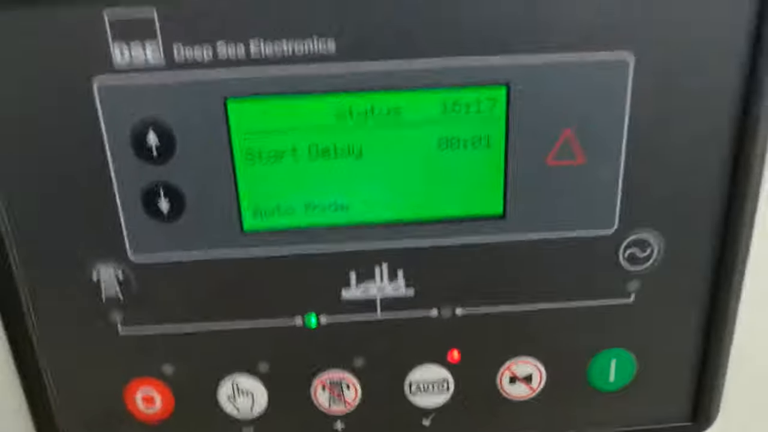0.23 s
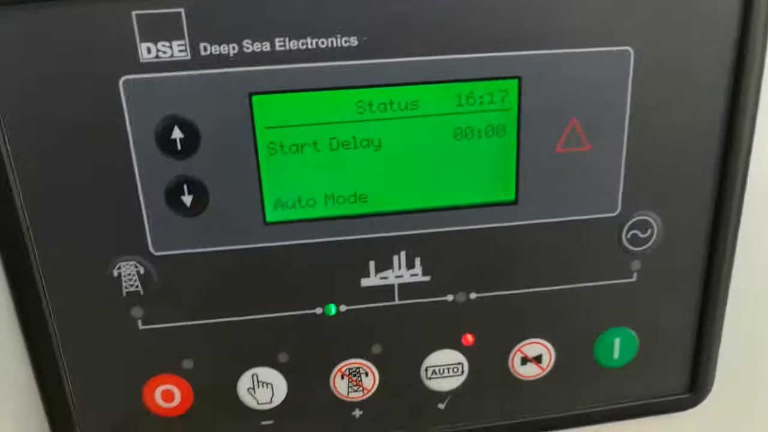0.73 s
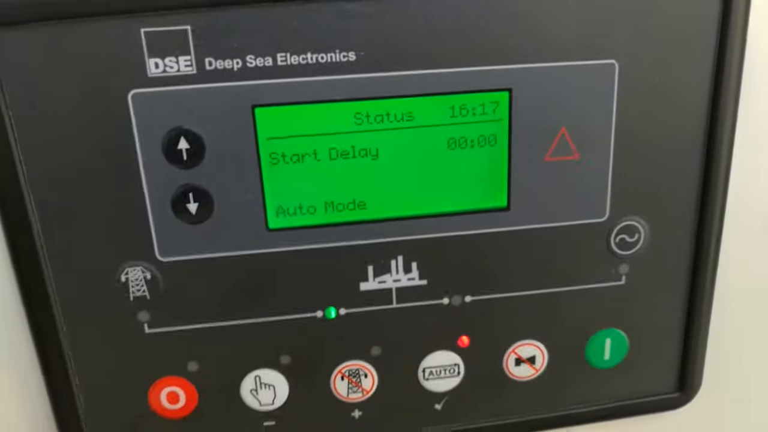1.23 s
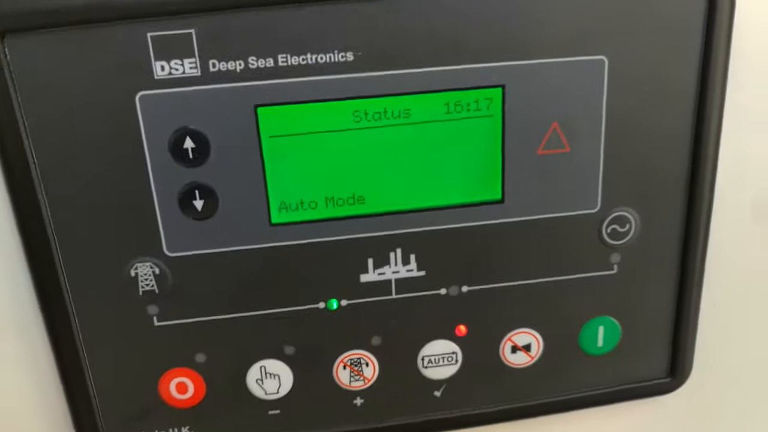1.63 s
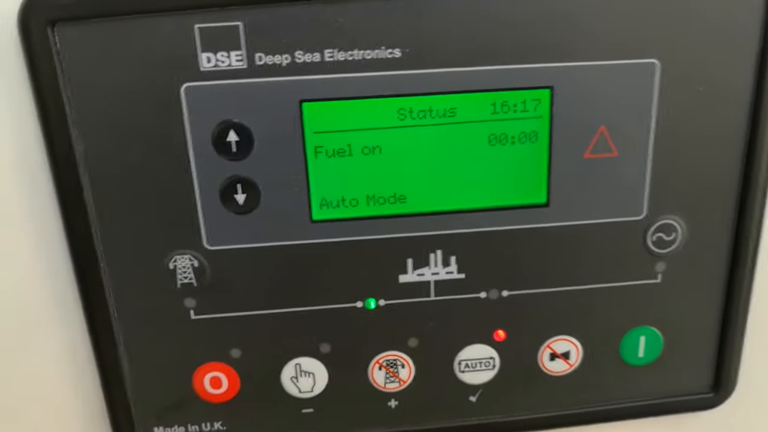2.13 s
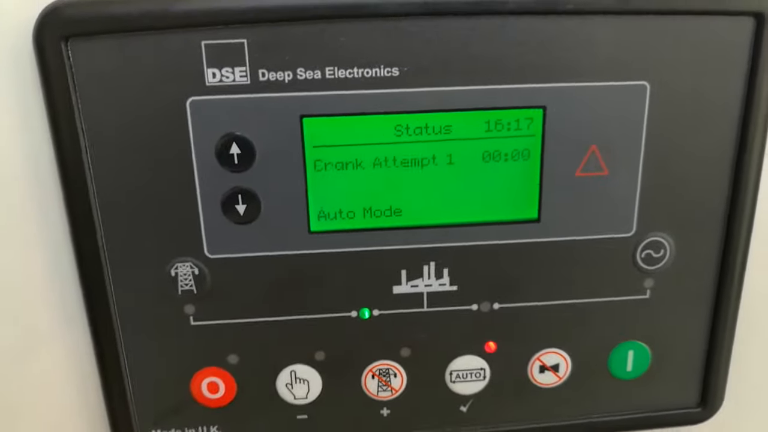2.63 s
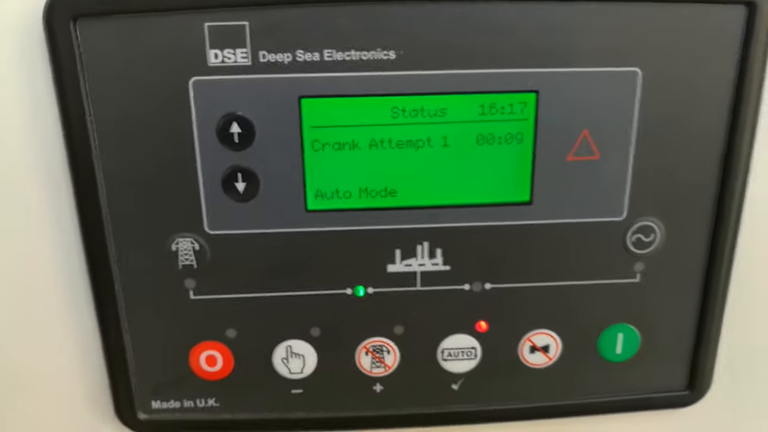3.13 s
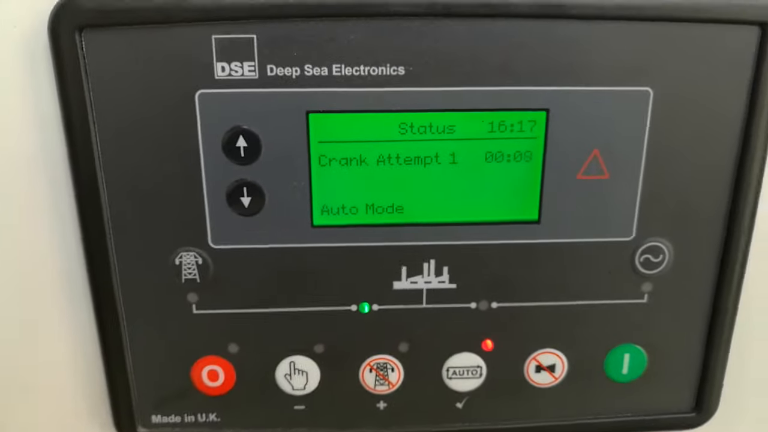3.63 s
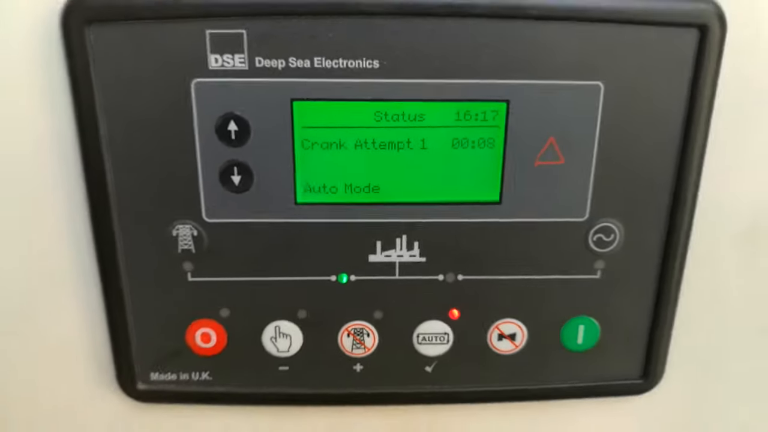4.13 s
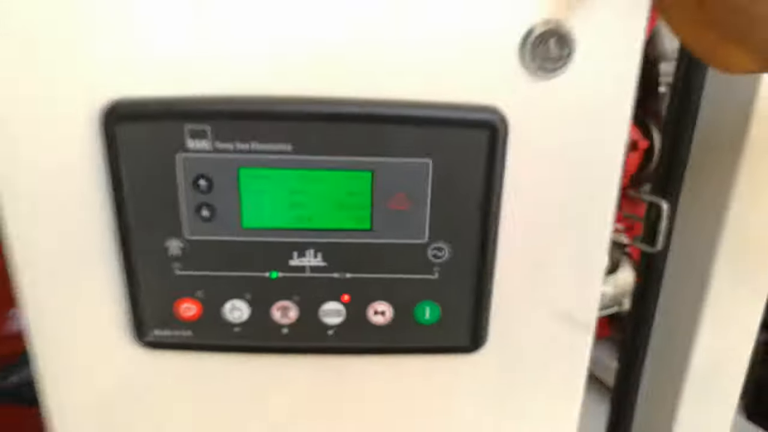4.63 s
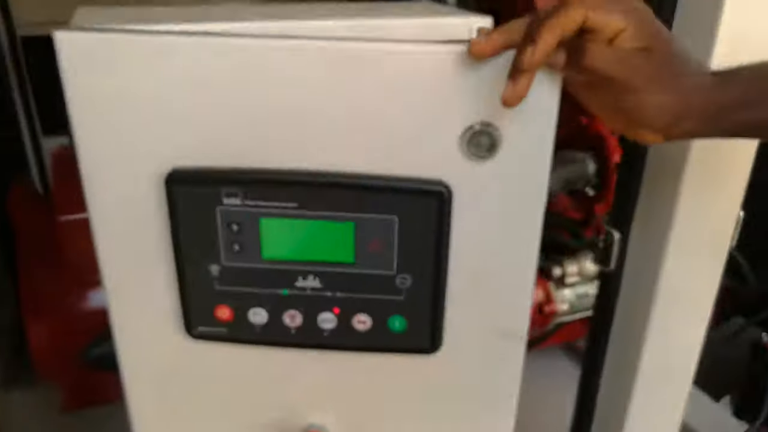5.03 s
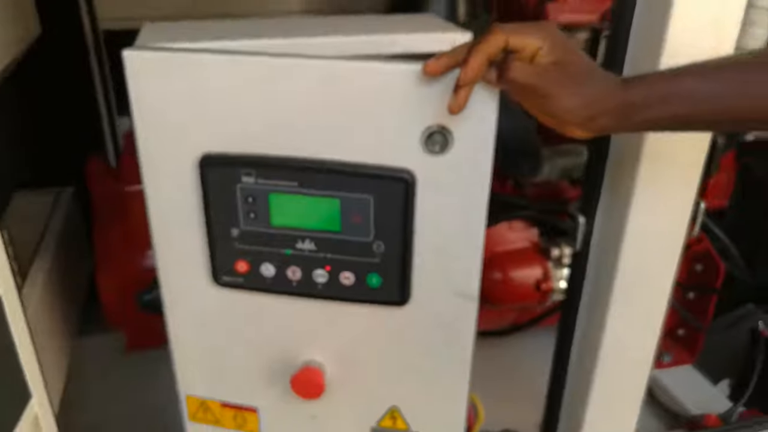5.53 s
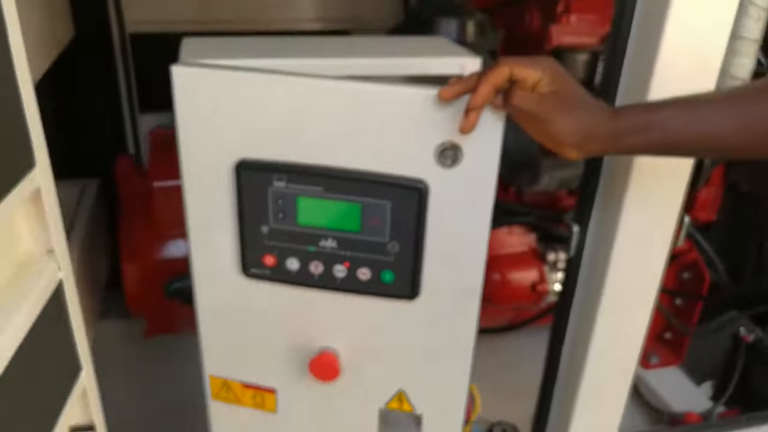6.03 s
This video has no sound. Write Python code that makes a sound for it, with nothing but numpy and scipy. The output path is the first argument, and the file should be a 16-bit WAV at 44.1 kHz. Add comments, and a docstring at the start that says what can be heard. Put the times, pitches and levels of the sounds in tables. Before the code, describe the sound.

Very quiet air with a faint distant hum and soft broom-like strokes. A small relay click, then a sudden heavy clank as the starter engages, whining and groaning through compressions. The diesel catches, knocks hard, growls upward with rattling metal, overshoots slightly, sags and settles into a steady drone. Handheld stereo microphone close to the steel enclosure, stepping back as the engine reaches speed.

```python
"""A three-cylinder diesel generator in a steel enclosure starts, races past its final speed and settles.
Crank angle times its exhaust pulses, metal knocks and gear tones; speed and fuel curves set their levels.
Before that a relay clicks and the starter slams in: a whine glides with its speed and dips at compressions.
Decaying coloured noise with damped sines makes the separate blows, clicks and panel rattles.
Behind them lie yard noise, the hum of a distant machine, broom-like strokes and faint far tones."""
import sys
import numpy as np
from scipy import signal
from scipy.fft import rfft, irfft, next_fast_len
from scipy.io import wavfile
from scipy.ndimage import uniform_filter1d

SR = 44100
rng = np.random.default_rng(int(sys.argv[2]) if len(sys.argv) > 2 else 0)


def int16_out(signal):
    """Quantize to a 16-bit WAV file."""
    q = np.round(np.clip(np.atleast_2d(signal).T, -1, 1) * 32767)
    wavfile.write(sys.argv[1], SR, q.astype(np.int16))


N = 277080
TIME = np.arange(N) / SR  # s

# Crankshaft speed. Each row: time in seconds, speed in rpm; the first firing falls on the first row.
RPM = [(3.049, 381), (3.25, 553), (4.0, 1415), (4.17, 1679), (4.32, 1698), (4.92, 1517), (5.1, 1560),
       (6.28, 1557)]
# Fuel: full up to speed, cut back on the overshoot, one surge to catch the sag.
# Each row: time in seconds, fuel from 0 to 1.
FUEL = [(4.2, 0.88), (4.35, .28), (4.87, 0.19), (4.9, 0.58), (4.985, 0.94), (5.03, 0.81), (5.13, 0.61),
        (5.22, 0.39), (5.35, 0.48), (5.8, 0.48), (6.28, 0.45)]
# How each engine sound follows the controls; it swells at a critical speed that shakes the enclosure.
# Each law: level in dB at full fuel and rated speed before that swell, dB per doubling of speed,
# dB lost with the fuel shut, critical speed in rpm, swell there in dB, dB lost on stepping back.
THUD_LAW = (-29, -3, 1, 1110, 6.5, 3)
BOOM_LAW = (-23.5, 3, 7, 1180, 0, 0)
KNOCK_LAW = (-21.5, 4.5, 14, 1298, 1.15, 0)
VALVE_LAW = (-30, 3.5, 3, 950, 5.5, 5.5)
AIR_LAW = (-29, 3.5, 4.5, 918, 2, 4)
SHAKE_WIDTH_RPM = 267  # from the critical speed to 1/e of the swell
STEP_BACK_S = (4.3, 4.58)  # the listener steps away from the enclosure

# Exhaust spectrum. Each row: frequency in Hz, relative density in dB per Hz.
EXHAUST = [(13, -36), (22, -12), (65, -15.5), (102, -6), (183, 0), (258, -9), (318, -3.5), (413, -21),
           (494, -11), (522, -12.5), (600, -18), (780, -50), (1320, -120)]
# Air resonances of the enclosure. Each row: frequency in Hz, level in dB, t60 in seconds.
CABIN_MODES = [(65, -1, 0.32), (180, -8.5, 0.21)]
# Settled drone. Each row: multiple of the four-stroke cycle rate, relative level in dB.
DRONE = [(1, -41), (2, -32), (3, -14), (4, -27), (5, -15), (6, -14), (7, -26), (8, -20), (9, -22), (10, 0),
         (11, -21), (12, -22), (13, -5), (14, -21), (15, -17), (16, -12), (17, -22), (18, -20), (19, -27),
         (20, -22), (21, -26), (22, -24), (23, -22), (24, -14), (25, -26), (26, -17), (27, -18), (28, -25)]
DRONE_DB = -23.5  # before the drone's share of the power is taken
# The bass merges into the drone between these times, up to the drone's final share of the power.
SETTLE_S, DRONE_SHARE = (4.87, 5.2), .9
# Growl of the exhaust as the engine races up. Each row: time in seconds, level in dB.
GROWL = [(3.06, -45), (3.2, -25), (3.35, -22.5), (3.5, -28), (3.63, -22), (3.74, -23.5), (4.02, -19),
         (4.07, -38), (4.18, -23.5), (4.55, -26), (4.85, -36), (5.3, -58)]
# Enclosure resonances that the growl's orders climb through. Each row: frequency in Hz, relative level in dB.
GROWL_COLOUR = [(30, -15), (66, -6), (90, -8), (110, -6.5), (135, 0), (155, 2), (180, 4.5), (215, -3.5),
                (245, -7.5), (270, -16), (315, -6.5), (350, -18), (400, -36)]
# Struck block, heard near. Each row: frequency in Hz, relative density in dB per Hz.
BLOCK = [(210, -49), (350, 18.5), (412, -9), (680, -0.5), (831, -5), (954, 4.5), (1290, -1.5), (1580, -2.5),
         (1900, -3.5), (2200, -5), (2950, -5), (3470, -3.5), (4080, -6.5), (7000, -16), (9100, -48),
         (15400, -120)]
# Clear rings of the block and its covers. Each row: mean frequency in Hz, mean level in dB, t60 in seconds.
BLOCK_MODES = [(540, -21, 0.28), (701, -21.5, 0.46), (945, -11.5, 0.21), (1045.5, -15.5, 0.23),
               (1262, -17, 0.24), (1402, -12.5, 0.11), (1554, -7.5, 0.13), (1917, -10.5, 0.1),
               (3450, -19, 0.089), (3820, -12, 0.074), (5510, -11, 0.076)]
# Knock heard from a step away, where no single ring stands out.
# Each row: frequency in Hz, relative density in dB per Hz.
KNOCK_AFAR = [(350, 16), (430, -4), (530, -5), (580, -7.5), (690, -0.5), (860, -2.5), (970, 3), (1080, -2),
              (1230, 0.5), (1330, -1.5), (1520, -1), (1700, -0.5), (1900, -2.5), (2030, -5.5), (2700, -5.5),
              (5000, -7)]
# Timing gears. Each row: teeth meshing per cycle, median level in dB, time in seconds when the tone is half in.
GEAR_TONES = [(73, -41, 5.1), (76, -37.5, 5.4), (79, -43, 5.1), (87, -42.5, 5.1), (95, -41.5, 5.6),
              (126, -37.5, 5.1), (129, -42, 5.4), (132, -40, 5.1)]
# Rushing air. Each row: frequency in Hz, relative density in dB per Hz.
AIR = [(240, -42), (400, -10), (562, -8), (687, -5), (826, -8), (949, 0), (1290, -5), (1580, -2),
       (2050, 25), (3470, 0), (6240, -16.5), (11200, -19.5), (16000, -31)]

# The unloaded starter spins up towards a top pitch, with this time constant.
SPIN_FROM_S, SPIN_UP_S, WHINE_TOP_HZ = 2.4, .5, 8540
# Compressions drag the starter down. Each row: slowest moment in seconds, time to 1/e in seconds,
# share of speed lost, rise of the gear noise in dB.
COMPRESSIONS = [(2.696, 0.061, 0.35, 5.5), (2.939, 0.057, .33, 11), (3.088, 0.081, .25, 0.5)]
LOAD_LEAD_S = 0.013  # the teeth bear hardest this long before the slowest moment
# Starter noises. Each law: level in dB at half the top speed, dB per doubling of speed.
RUMBLE_LAW = (-33, -4)
GEAR_LAW = (-33.5, -2.5)
BRUSH_LAW = (-33, 4.8)
# Starter spectrum. Each row: frequency in Hz, relative density in dB per Hz.
STARTER = [(15, -41), (25, -11), (59, -1.5), (185, -2.5), (363, -11.5), (575, -10.5), (936, 3), (1100, -11),
           (1260, -6.5), (1440, -8), (2280, -7), (3160, -4.5), (6210, -25), (10700, -25.5), (16000, -33.5)]
# Starter housing and ring gear. Each row: frequency in Hz, width in Hz, lift in dB.
GEAR_MODES = [(440, 17, 21), (855, 28, 3), (945, 20, 8.5), (1250, 28, 13), (2030, 61, 10), (3140, 200, 0)]
# Housing resonances that the whine glides through. Each row: frequency in Hz, level in dB.
WHINE_COLOUR = [(1500, -54), (1950, -35), (2450, -36), (2850, -28.5), (3450, -25.5), (4300, -33),
                (4900, -25.5), (5500, -42), (7200, -33), (8200, -43)]
# Main mesh and its sidebands. Each row: ratio to the main mesh, relative level in dB.
WHINE_PARTIALS = [(.8, -13), (.92, -11), (1, 0), (1.08, -12)]
# Higher meshes, heard while the starter spins up. Each row: ratio to the main mesh, relative level in dB.
HIGHER_MESHES = [(1.31, -12), (1.72, -10)]
# Shares of pitch: the whine's waver, and the extra while the pinion chatters just before the first firing.
WHINE_WAVER, CHATTER_WAVER = .012, .025
# The housing groans when the teeth bear hard. Each row: peak in seconds, level in dB, time to 1/e in seconds.
GROANS = [(2.535, -36, .025), (2.612, -32, .018), (2.655, -23, .014), (2.693, -28, .014),
          (2.825, -30, .022), (2.893, -23, .022)]
# Notes of the groan. Each row: frequency in Hz, relative level in dB, exponent applied to the groan's envelope.
GROAN_NOTES = [(1258, 0, 1), (945, -17, .5)]
# The ring gear squeals under load. Each row: time in seconds, frequency in Hz, level in dB.
SQUEAL = [(2.67, 3160, -70), (2.70, 3140, -31), (2.73, 3130, -47), (2.78, 3200, -55), (2.805, 3170, -23),
          (2.84, 3330, -39), (2.88, 3150, -25), (2.92, 2630, -27), (2.96, 2600, -65)]

# Heavy blows, from the pinion thrown in to the hardest firings of the run-up.
# Each row: start in seconds, level in dB, t60 in seconds, brightest frequency in Hz, thump level in dB.
BLOWS = [(2.446, -15.5, 0.16, 4170, -39), (2.465, -11, 0.069, 1310, -19.5), (2.648, -26, 0.13, 950, -31),
         (2.805, -27, 0.72, 2650, -47), (2.917, -21, 0.14, 1200, -26), (3.047, -15.5, 0.1, 1412, -22),
         (3.078, -24, 0.089, 1498, -35), (3.166, -30, 0.073, 1100, -32), (3.223, -12, 0.14, 1540, -22),
         (3.252, -23, .08, 1250, -24.5), (3.293, -13, 0.11, 1680, -19), (3.354, -38, 0.09, 1500, -22.5),
         (3.557, -20.5, 0.19, 1190, -25), (3.601, -22, .1, 1450, -21), (3.643, -18.5, 0.13, 1690, -24),
         (3.682, -17.5, 0.14, 1500, -37), (3.719, -20, 0.15, 1400, -30), (3.915, -15.5, 0.13, 1433, -20),
         (3.976, -13, 0.087, 1530, -18), (4.004, -14, 0.11, 1300, -22), (4.084, -22, 0.1, 1500, -39),
         (4.137, -16.5, 0.076, 1900, -28), (4.161, -18, 0.14, 1390, -24), (4.236, -26, 0.09, 1050, -26)]
# Small sharp clicks and ticks.
# Each row: start in seconds, level in dB, t60 in seconds, brightest frequency in Hz.
CLICKS = [(.03, -46.5, .12, 4600), (.356, -57, 0.066, 300), (.357, -64, .06, 1200),
          (3.293, -19, 0.042, 7460), (3.556, -26, 0.076, 7600), (3.855, -26, .07, 7500),
          (3.944, -24.5, 0.1, 7500)]
# A loose panel chatters, jolted by the starter and shaken by the engine.
# Each row: start in seconds, level in dB.
RATTLES = [(2.449, -22.5), (3.492, -32), (3.675, -23), (3.681, -20), (3.686, -17), (3.694, -22),
           (3.727, -20), (3.742, -25.5)]
# The panel. Each row: mean frequency in Hz, mean level in dB, t60 in seconds.
PANEL_MODES = [(2190, -2, 0.073), (2740, -9, 0.055), (3486, 3, 0.083), (3820, -17, .08),
               (4500, -2.5, 0.077)]
# The relay's armature lets go, snaps shut and bounces. Each row: start in seconds, level in dB.
RELAY = [(1.7313, -56.5), (1.734, -49), (1.741, -50)]
# Relay frame and spring. Each row: mean frequency in Hz, mean level in dB, t60 in seconds.
RELAY_MODES = [(2900, -10, .06), (3420, -3, .06), (3510, -5, .075), (4463, -12, .05), (5660, -11, .05)]

# Quiet air of the yard. Each row: frequency in Hz, relative density in dB per Hz.
YARD = [(15, -2), (32, 8), (50, -2.5), (90, -7.5), (200, -6), (320, -14.5), (450, -23.5), (700, -22.5),
        (1800, -19), (2600, -28.5), (3350, -27), (4000, -31.5), (8000, -41), (16000, -47)]
YARD_DB = -60.5
# Distant machine. Each row: mean frequency in Hz, relative level in dB.
HUM = [(145.3, -62.5), (193.8, -65.5), (694.4, -81), (893.6, -87), (1071, -84), (3068, -96), (3402, -88)]
HUM_DB, HUM_FADE_DB_PER_S = -57.5, 2.5  # level at the start, before it swells and fades
# Broom strokes. Each row: loudest moment in seconds, level in dB, rise to and fall from it in seconds (1/e).
STROKES = [(.02, -52.5, .05, 0.096), (.7, -47, .075, 0.085), (.85, -51.5, 0.076, 0.087),
           (1.485, -49.5, 0.064, 0.16), (1.865, -65, .035, 0.063), (2.18, -47, 0.083, 0.13)]
STROKE_TAIL_POWER = 1.53  # 1 dies away evenly, 2 falls like a bell
# Broom spectrum. Each row: frequency in Hz, relative density in dB per Hz.
SWISH_COLOUR = [(710, -43), (1200, 1.5), (1400, -21), (1770, -11), (2790, 0.5), (3360, 0), (4700, 4),
                (8080, 0.5), (11400, 3.5), (16000, -3.5)]
# Faint far-off tones. Each row: peak in seconds, mean frequency there in Hz, level in dB,
# time to 1/e in seconds, glide in Hz per second.
FAR_TONES = [(.78, 890, -71, .22, 0), (1.14, 501, -72.5, 0.065, 0), (1.961, 522, -68, .035, -200),
             (2.32, 310, -64, 0.054, -150), (2.34, 1205, -67, 0.13, -700)]

# Microphone pair, width. Each row: frequency in Hz, side minus mid in dB.
WIDTH = [(60, -49), (110, -59), (200, -12), (380, 3), (700, 3), (1290, 0.5), (2380, 1.5), (4400, -0.5),
         (8120, 0.5), (15000, -0.5)]
# Microphone pair, lean. Each row: frequency in Hz, left minus right in dB.
LEAN = [(60, 0.0), (110, 0.0), (200, 0.0), (380, 0.5), (700, -1.5), (1290, 0.5), (2380, 1.0), (4400, 1.5),
        (8120, 5.0), (15000, 3.5)]
# Flat spectrum. Each row: frequency in Hz, relative density in dB per Hz.
WHITE = [(1, 0), (2, 0)]
CUTOFF_HZ = 15900


def engine():
    """Phase locking: exhaust, knock, valve gear, gears and gusts of air all follow the crank angle."""
    rpm, = in_time(RPM)
    fuel, = np.clip(in_time(FUEL), 0, 1)
    # one four-stroke cycle takes two turns
    cycle = np.cumsum(rpm * (TIME >= RPM[0][0])) / (120 * SR) + 1e-9
    speed = rpm / RPM[-1][1]
    settled = np.clip(.03 + (DRONE_SHARE - .03) * ramp(*SETTLE_S), 0, 1)
    laws = (THUD_LAW, BOOM_LAW, KNOCK_LAW, VALVE_LAW, AIR_LAW)
    thud_db, boom_db, knock_db, valve_db, air_db = (engine_level(law, rpm, fuel) for law in laws)

    near = metal(cycle, speed, fuel, BLOCK, BLOCK_MODES, low_hz=472, high_hz=2660, t60=0.075,
                 slap_db=-6, loose=0.45, whirr=0.5)
    afar = metal(cycle, speed, fuel, KNOCK_AFAR, (), low_hz=472, high_hz=2660, t60=0.075,
                 slap_db=-3, loose=0.35, whirr=0.5)
    away = ramp(*STEP_BACK_S)
    knock = from_db(knock_db) * (np.sqrt(1 - away) * near + np.sqrt(away) * afar)
    valves = from_db(valve_db) * metal(cycle, speed, fuel, BLOCK, (), low_hz=2820, high_hz=5330, t60=0.2,
                                       slap_db=7.5, loose=0.51, whirr=0.83)

    # the air gusts three and six times a cycle
    gusts_db = (.7 + 1.2 * fuel) * np.cos(2 * np.pi * (3 * cycle - .2))
    gusts_db = gusts_db + 1.2 * np.cos(2 * np.pi * (6 * cycle - .3))
    air = from_db(air_db + gusts_db) * noise(AIR, 5420, 20400)
    bass = exhaust(cycle, settled, thud_db, boom_db) + growl(cycle, rpm)
    return (bass + knock + valves + gears(cycle) + air) * ramp(3.045, 3.086)


def engine_level(law, rpm, fuel):
    """Forced resonance: level in dB follows speed and fuel, swells at a critical speed, drops with distance."""
    full_db, speed_db, shut_db, critical_rpm, shake_db, away_db = law
    shake = np.exp(-((rpm - critical_rpm) / SHAKE_WIDTH_RPM) ** 2)
    control_db = full_db + speed_db * np.log2(rpm / RPM[-1][1]) - shut_db * (1 - fuel)
    return control_db + shake_db * shake - away_db * ramp(*STEP_BACK_S)


def exhaust(cycle, settled, thud_db, boom_db):
    """Periodicity: at steady speed the separate pulses merge into a drone of harmonics of the cycle."""
    thud = from_db(thud_db) * pulses(cycle, low_hz=22, high_hz=120, t60=.13, own_share=.5, rumble=.55)
    boom = from_db(boom_db) * pulses(cycle, low_hz=158, high_hz=416.0, t60=0.17, own_share=0.34, rumble=0.91)
    drone = 0
    for order, db in DRONE:
        # left and right phases drift apart at the high orders
        spread = rng.normal(0, 1, (2, 1)) * (order / len(DRONE)) ** 3 / 10
        drone = drone + from_db(db) * np.sin(2 * np.pi * (order * cycle + rng.random() + spread))
    drone_gain = from_db(DRONE_DB) / mid_rms(drone)
    return np.sqrt(1 - settled) * (thud + boom) + np.sqrt(settled) * drone_gain * drone


def pulses(cycle, low_hz, high_hz, t60, own_share, rumble):
    """Impulse response: each firing booms in the enclosure, slightly differently for each cylinder."""
    shared = ring(EXHAUST, low_hz, high_hz, t60, CABIN_MODES)
    out = 0
    for k in range(3):
        clicks = contacts(cycle - k / 3, scatter_db=3.0, jitter_s=0.00034)
        out = out + strike(clicks, shared + own_share * ring(EXHAUST, low_hz, high_hz, t60))
    return steady(steady(out) + rumble * noise(EXHAUST, low_hz, high_hz))


def growl(cycle, rpm):
    """Order spectrum: unequal firings fill in orders between the firing harmonics; all climb with speed."""
    out = 0
    for order in range(3, 37):
        # orders off the firing harmonics lie 3 dB lower
        db = at_hz(GROWL_COLOUR, order * rpm / 120) - 3.0 * (order % 3 > 0)
        uneven = np.interp(3 * cycle, np.arange(256), rng.standard_normal(256))
        out = out + from_db(db + 1.7 * uneven) * np.sin(2 * np.pi * (order * cycle + rng.random()))
    return from_db(in_time(GROWL)[0]) * steady(out * np.ones((2, 1)))


def metal(cycle, speed, fuel, colour, modes, low_hz, high_hz, t60, slap_db, loose, whirr):
    """Impact excitation: firings knock the block; piston and valves slap it half-way to the next firing."""
    out, envelope = 0, 0
    power_decay = from_db(-120 / (t60 * SR))
    for k in range(6):
        firing = 0.62 + 0.26 * fuel
        slap = from_db(slap_db) * (1.02 - 0.16 * fuel) * speed ** 2
        force = slap if k % 2 else firing
        clicks = contacts(cycle - k / 6, scatter_db=1.3, jitter_s=.00005) * force
        out = out + strike(clicks, ring(colour, low_hz, high_hz, t60, modes, attack_s=0.0026))
        envelope = envelope + signal.lfilter([1], [1, -power_decay], clicks ** 2 + 1e-18)
    # part of every blow is turbulent and differs from cycle to cycle
    turbulent = steady(np.sqrt(envelope) * noise(colour, low_hz, high_hz))
    struck = steady(steady(out) + loose * turbulent)
    # at low speed the whirr of the turning parts fills the gaps between blows
    turning = whirr * np.clip(1.25 - speed, 0, 1) * noise(colour, low_hz, high_hz)
    return steady(struck * np.minimum(speed, 1) + turning)


def gears(cycle):
    """Phase modulation: uneven running at each firing spreads every tooth tone into sidebands; it flutters."""
    uneven = .9 * np.sin(2 * np.pi * 3 * cycle)  # radians
    out = 0
    for teeth, db, s in GEAR_TONES:
        level = from_db(db + 3 * flutter(per_s=30)) * ramp(s - .2, s + .2)
        phase = 2 * np.pi * (round(teeth) * cycle + rng.random((2, 1)) / 4) + uneven
        out = out + level * np.sin(phase)
    return out


def starter():
    """Mesh frequency: pitch follows motor speed, which nears its top exponentially and dips under load."""
    spin = 1 - np.exp(-np.maximum(TIME - SPIN_FROM_S, .05) / SPIN_UP_S)
    drag = sum(lost * swell(s, half_s, half_s) for s, half_s, lost, _ in COMPRESSIONS)
    strain_db = sum(db * swell(s - LOAD_LEAD_S, half_s, half_s * 0.6) for s, half_s, _, db in COMPRESSIONS)
    whine_hz = WHINE_TOP_HZ * spin * np.clip(1 - drag, .1, 1)
    load = grind(spin, strain_db, whine_hz) * ramp(2.465, 2.48) * (1 - ramp(3.37, 4.7))
    return load + whine(whine_hz) * ramp(2.48, 2.5) * (1 - ramp(2.34, 5.6))


def grind(spin, strain_db, whine_hz):
    """Contact noise: the pinion's uneven teeth ring the housing, over a low rumble and the brushes' hiss."""
    laws = (RUMBLE_LAW, GEAR_LAW, BRUSH_LAW)
    rumble_db, gear_db, brush_db = (db + speed_db * np.log2(2 * spin) for db, speed_db in laws)
    # one contact for every 22 periods of the whine
    teeth = contacts(np.cumsum(whine_hz) / SR / 22, scatter_db=3.0, jitter_s=0.00051)
    decay = from_db(-60 * TIME[:SR // 8] / 0.088)
    housing = noise(STARTER, 590, 6900, GEAR_MODES, size=SR // 8) * decay
    gear = steady(strike(teeth, housing)) + 0.48 * noise(STARTER, 260, 5800, GEAR_MODES)
    rumble = from_db(rumble_db) * noise(STARTER, 30, 386)
    hiss = from_db(brush_db + 0.32 * strain_db) * noise(STARTER, 4460, 18000)
    return rumble + from_db(gear_db + strain_db) * gear + hiss


def whine(whine_hz):
    """Resonant emphasis: mesh tones swell in the housing's resonances, with its groans and the gear's squeal."""
    db = at_hz(WHINE_COLOUR, whine_hz) - 6.5 * ramp(2.76, 2.8)
    waver = WHINE_WAVER + CHATTER_WAVER * (ramp(2.75, 2.8) - ramp(3.03, 3.08))
    out = whistle(whine_hz, db, waver_share=waver, echo=.9, flicker_db=4.5, partials=WHINE_PARTIALS)
    out = out + whistle(whine_hz, db - 30 * ramp(2.66, 2.85), waver_share=waver, echo=.9,
                        flicker_db=4.5, partials=HIGHER_MESHES)
    groan = sum(from_db(groan_db) * swell(s, half_s, half_s) for s, groan_db, half_s in GROANS)
    # a faint groan lasts between the strong ones
    groan = groan + from_db(-42) * (1 - ramp(2.92, 3.0))
    for hz, note_db, power in GROAN_NOTES:
        note = whistle(hz, 0, waver_share=.016, echo=.4, flicker_db=2.5)
        out = out + from_db(note_db) * groan ** power * note
    return out + whistle(*in_time(SQUEAL), waver_share=.025, echo=0.8, flicker_db=-1.5)


def whistle(hz, db, waver_share, echo, flicker_db, partials=((1, 0),)):
    """Modulation and reverberation: uneven tooth contact breaks up each partial, echoes roughen the tone."""
    turn = np.cumsum(hz * (1 + waver_share * flutter(per_s=260))) / SR
    tone = 0
    for ratio, own_db in partials:
        level = from_db(db + own_db + flicker_db * flutter(per_s=150))
        tone = tone + level * np.sin(2 * np.pi * ratio * turn)
    walls = ring(WHITE, 800, 13000, t60=0.047)
    return tone + echo * strike(tone, walls / np.sqrt(np.sum(walls[0] ** 2)))


def blows():
    """Free vibration: blows clank in the block and thump the enclosure, a panel rattles, small parts click."""
    out = np.zeros((2, N))
    for s, db, t60, bright_hz, thump_db in BLOWS:
        clank = ring(hump(bright_hz, fall_db=27), 230, 19000, t60, BLOCK_MODES, attack_s=0.0026)
        add(out, s, from_db(db) * clank)
        add(out, s, from_db(thump_db) * ring(EXHAUST, 66, 400, t60=0.25, attack_s=0.002))
    for s, db, t60, bright_hz in CLICKS:
        click = ring(hump(bright_hz, fall_db=40), bright_hz / 6, min(bright_hz * 4.9, 17000), t60)
        add(out, s, from_db(db) * click)
    for s, db in RATTLES:
        add(out, s, from_db(db) * ring(hump(3200, fall_db=34), 1700, 4700, t60=0.16, modes=PANEL_MODES))
    # the solenoid plunger scrapes forward just before it lands
    add(out, 2.438, from_db(-26) * ring(hump(3850, fall_db=10), 270, 17000, t60=0.27, attack_s=0.0075))
    add_relay(out)
    return out


def add_relay(out):
    """Modal decay: the armature rings frame and spring, and the snap echoes briefly in the control cabinet."""
    for s, db in RELAY:
        snap = ring(hump(4070, fall_db=26), 500, 9000, t60=0.058, modes=RELAY_MODES, attack_s=.0003)
        add(out, s, from_db(db) * snap)
        add(out, s, from_db(db - 8) * ring(hump(4600, fall_db=20), 700, 17000, t60=0.14))


def yard():
    """Superposition: quiet air, the hum of a distant machine and strokes like a broom's add together."""
    return from_db(YARD_DB) * noise(YARD, 16, 17000) + distant_hum() + broom()


def distant_hum():
    """Slow modulation: steady partials share one wander in pitch, and swell and fade together."""
    wander = np.cumsum(1 + 0.0062 * noise(WHITE, 0.57, 7)[0]) / SR
    hum = sum(from_db(db) * np.sin(2 * np.pi * (hz * wander + rng.random())) for hz, db in HUM)
    hum = hum * np.ones((2, 1)) * from_db(2.2 * noise(WHITE, 1.5, 9)[0])
    return from_db(HUM_DB - HUM_FADE_DB_PER_S * TIME) * hum / mid_rms(hum)


def broom():
    """Amplitude envelope: every stroke shapes the same coloured noise, and their powers add."""
    power = 0
    for s, db, rise_s, fall_s in STROKES:
        power = power + (from_db(db) * swell(s, rise_s, fall_s, STROKE_TAIL_POWER)) ** 2
    return np.sqrt(power) * noise(SWISH_COLOUR, 1320, 24000)


def far_tones():
    """Frequency glide: a few faint, short tones drift in from far away, some falling in pitch."""
    out = 0
    for s, hz, db, half_s, glide_hz_per_s in FAR_TONES:
        pitch = (hz + glide_hz_per_s * (TIME - s)) * (1 + 0.0073 * flutter(per_s=60))
        out = out + from_db(db) * swell(s, half_s, half_s) * np.sin(2 * np.pi * np.cumsum(pitch) / SR)
    return out


def ring(spectrum, low_hz, high_hz, t60, modes=(), attack_s=0.00083):
    """Modal decay: crowded modes are dying noise, with clear rings above that differ a little each time."""
    age = TIME[:SR // 3]
    out = noise(spectrum, low_hz, high_hz, size=len(age)) * from_db(-60 * age / t60)
    for hz, db, mode_t60 in modes:
        heard = low_hz < hz < high_hz
        own_db, detune = rng.normal(0, (2.5, .006))
        # the two channels differ more in phase at higher pitch
        phase = rng.random() + rng.random((2, 1)) / 3 * min(hz / 600, 1)
        level = heard * from_db(db + own_db - 60 * age / mode_t60)
        out = out + level * np.sin(2 * np.pi * (hz * (1 + detune) * age + phase))
    rise = 1 - np.exp(-age / attack_s)
    return signal.sosfilt(signal.butter(2, low_hz / 2, "high", fs=SR, output="sos"), out * rise)


def strike(clicks, response):
    """Convolution: a train of clicks is played through a stereo impulse response."""
    return signal.oaconvolve(clicks[None], response, axes=1)[:, :N]


def contacts(phase, scatter_db, jitter_s):
    """Quasi-periodicity: one click as the phase passes each whole number, with chance in time and level."""
    at = np.flatnonzero(np.diff(np.floor(phase)) > 0)
    chance = rng.standard_normal((len(at), 2))
    shift = np.round(chance[:, 0] * jitter_s * SR).astype(int)
    clicks = np.zeros(N)
    clicks[np.clip(at + shift, 0, N - 1)] = from_db(scatter_db * chance[:, 1])
    return clicks


def noise(spectrum, low_hz, high_hz, modes=(), size=N):
    """Spectral shaping: stereo noise of a given colour with resonances lifted out; rms of its middle is 1."""
    padded = next_fast_len(size, True)
    hz = np.maximum(np.fft.rfftfreq(padded, 1 / SR), 1)
    gain = from_db(at_hz(spectrum, hz)) / np.sqrt((1 + (low_hz / hz) ** 10) * (1 + (hz / high_hz) ** 10))
    for centre, width, lift_db in modes:
        gain = gain * (1 + (from_db(lift_db) - 1) / (1 + (2 * (hz - centre) / width) ** 2))
    mid, side = rfft(rng.standard_normal((2, padded)))
    signs = np.array([[1], [-1]])
    pair = mid + signs * side * from_db(at_hz(WIDTH, hz))
    pair = pair * from_db(signs * at_hz(LEAN, hz) / 2)
    out = irfft(pair * gain, padded)[:, :size]
    return out / mid_rms(out)


def hump(centre_hz, fall_db):
    """Spectral envelope: a broad spectrum falls away on both sides of its brightest point."""
    return [(centre_hz / 10, -fall_db), (centre_hz / 2, -fall_db / 10), (centre_hz, 0),
            (centre_hz * 2, -fall_db / 4), (centre_hz * 10, -fall_db)]


def steady(x):
    """Power normalization: the slow level is brought to about rms 1; single pulses keep their shape."""
    power = uniform_filter1d(x.mean(axis=0) ** 2, SR // 8)
    return x / np.sqrt(np.maximum(power, 0) + power.max() / 1000)


def flutter(per_s):
    """Random modulation: straight lines join new normal chance values, so many a second."""
    return np.interp(TIME * per_s, np.arange(4096), rng.standard_normal(4096))


def swell(s, rise_s, fall_s, tail_power=2):
    """Envelope: a bell of height 1 around a moment, with its own rise and fall."""
    away = np.abs(TIME - s)
    exponent = np.where(TIME < s, (away / rise_s) ** 2, (away / fall_s) ** tail_power)
    return np.exp(-np.minimum(exponent, 50))


def ramp(start, end):
    """Linear crossfade: goes from 0 to 1 between two times."""
    return np.clip((TIME - start) / max(end - start, 1e-3), 0, 1)


def in_time(rows):
    """Linear interpolation: each column of a curve at every sample."""
    s, *columns = np.transpose(rows)
    return [np.interp(TIME, s, c) for c in columns]


def at_hz(points, hz):
    """Logarithmic pitch scale: a spectrum read on a log-frequency axis."""
    point_hz, point_db = np.array(points).T
    return np.interp(np.log(hz), np.log(point_hz), point_db)


def from_db(db):
    """Decibel scale: amplitude ratio of a level."""
    return 10 ** (np.asarray(db) / 20)


def mid_rms(x):
    """Effective value: rms of the middle of a stereo pair."""
    return np.sqrt(np.mean(x.mean(axis=0) ** 2) + 1e-20)


def add(out, s, sound):
    """Superposition: lays a sound in at a time."""
    start = round(s * SR)
    out[:, start:start + sound.shape[1]] += sound[:, :N - start]


def scene():
    """Superposition: engine, starter and blows over the yard and its far tones."""
    return engine() + starter() + blows() + yard() + far_tones()


def record(dry):
    """Band limiting and saturation: the lowest bass rolls off, peaks are rounded, the top is cut steeply."""
    x = signal.sosfilt(signal.butter(2, 16, "high", fs=SR, output="sos"), dry)
    rounded = 1.2 * np.tanh(x / 1.2)
    return signal.sosfilt(signal.ellip(12, .1, 90, CUTOFF_HZ, fs=SR, output="sos"), rounded)


dry = scene()
out = record(dry)
int16_out(out)
```